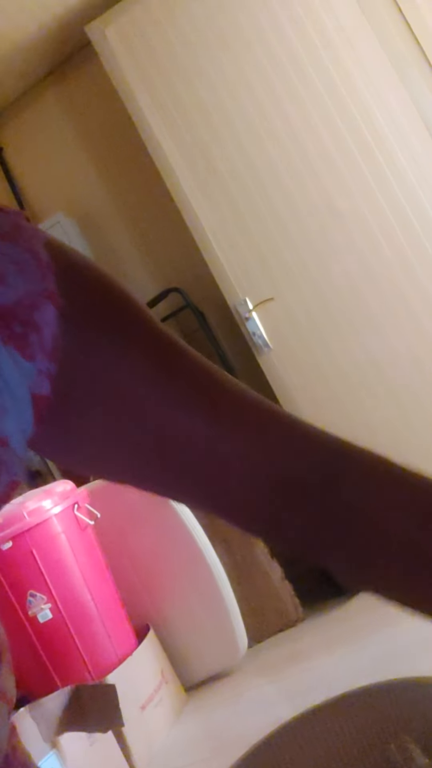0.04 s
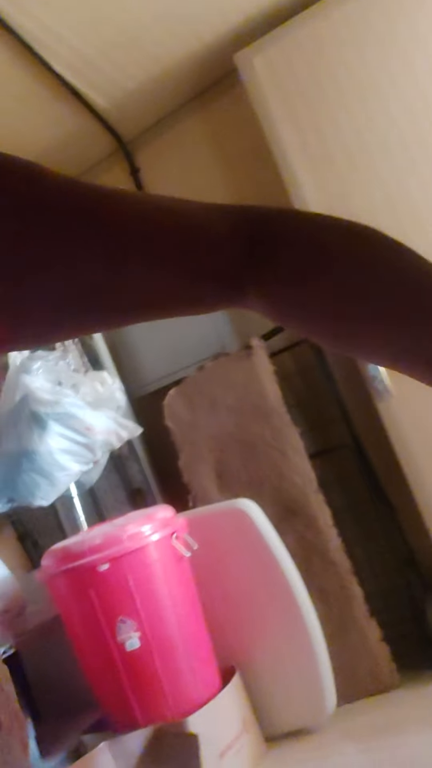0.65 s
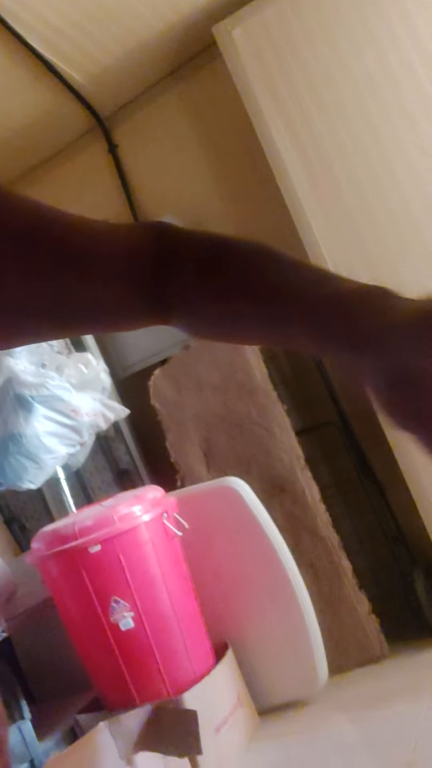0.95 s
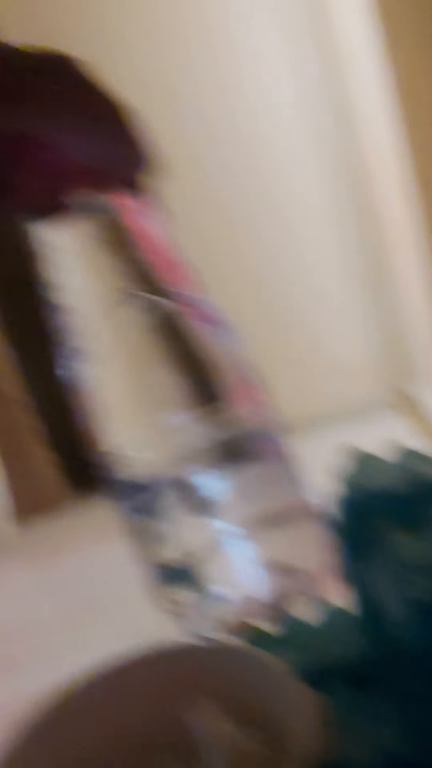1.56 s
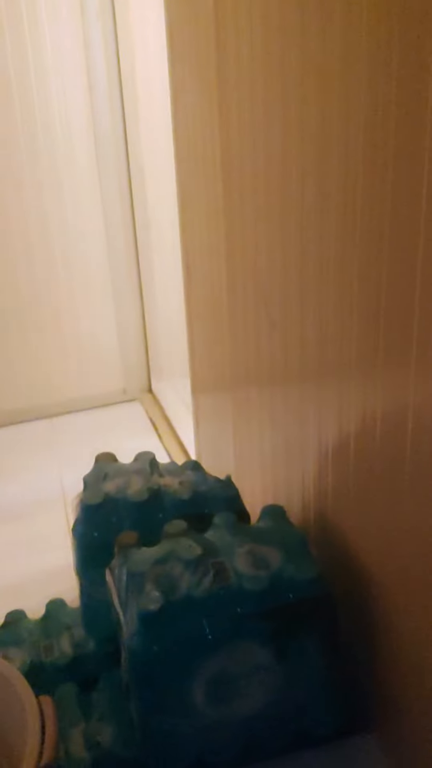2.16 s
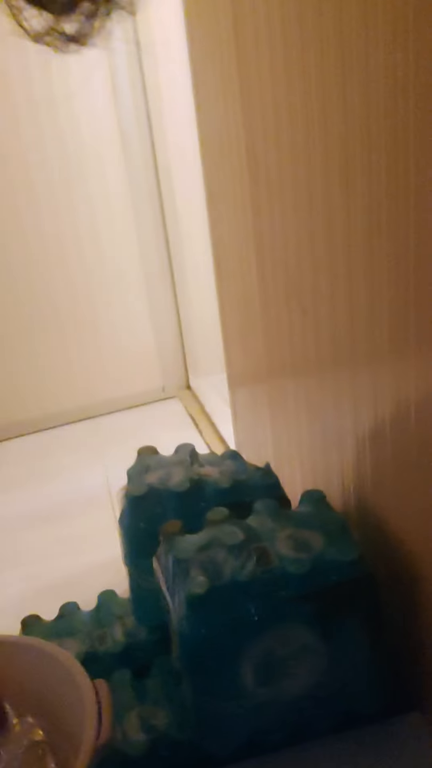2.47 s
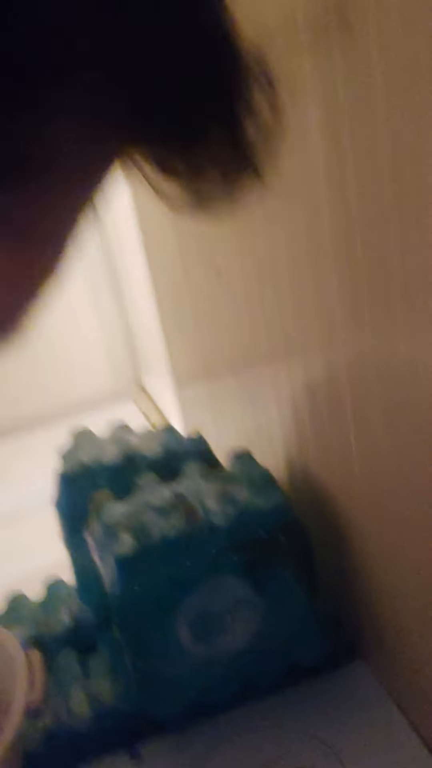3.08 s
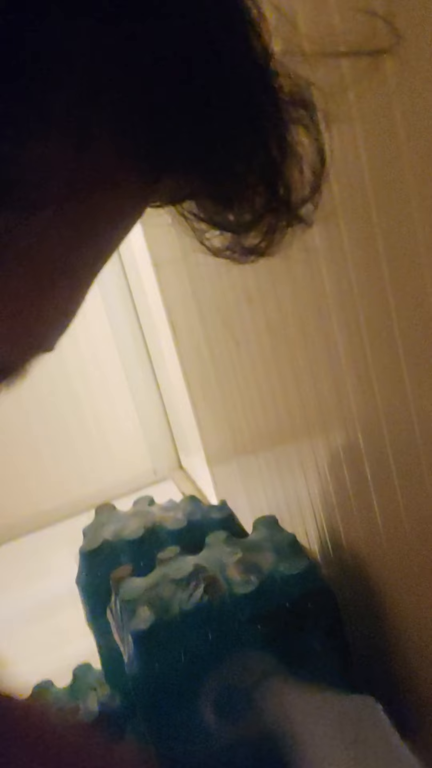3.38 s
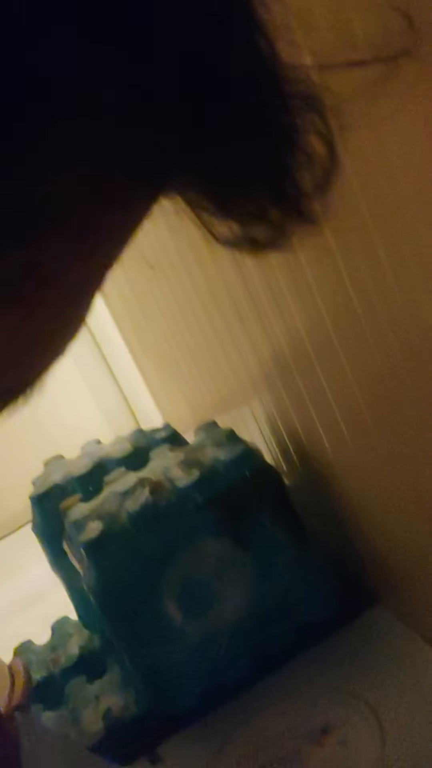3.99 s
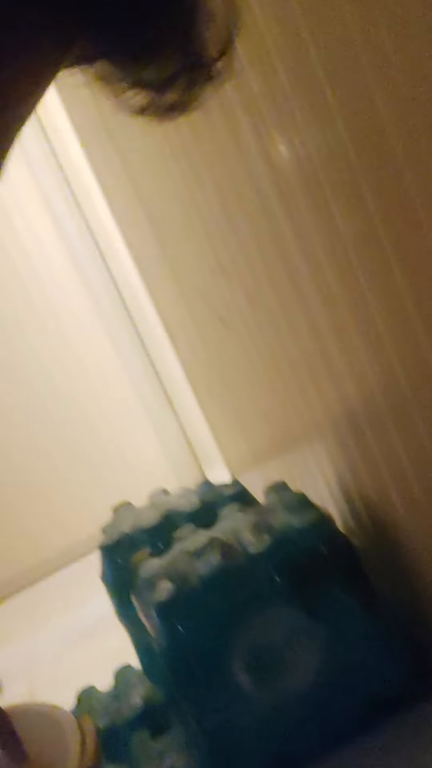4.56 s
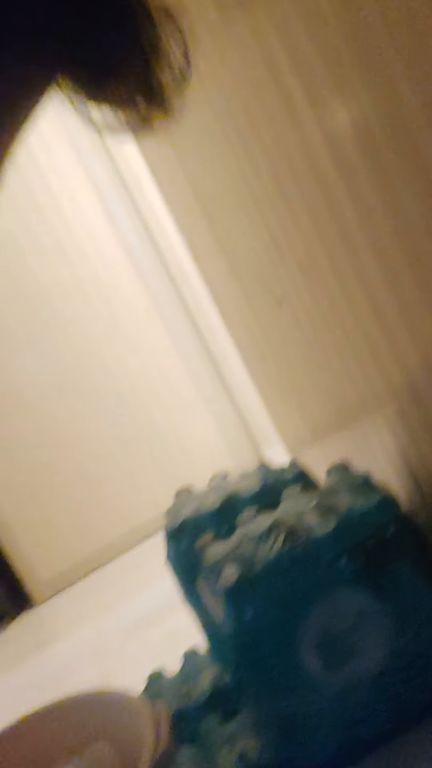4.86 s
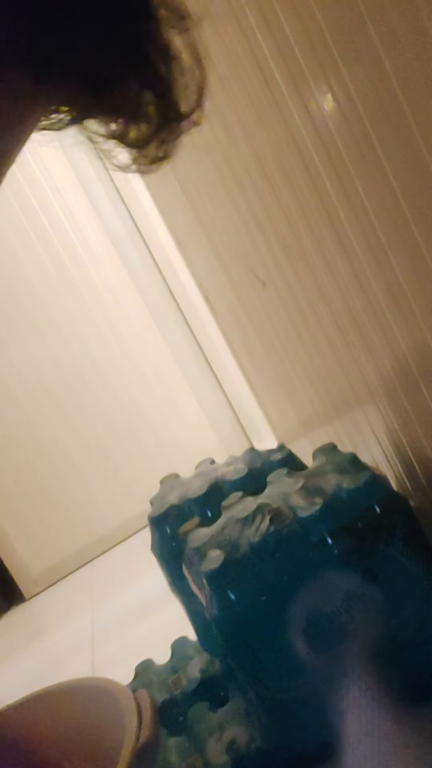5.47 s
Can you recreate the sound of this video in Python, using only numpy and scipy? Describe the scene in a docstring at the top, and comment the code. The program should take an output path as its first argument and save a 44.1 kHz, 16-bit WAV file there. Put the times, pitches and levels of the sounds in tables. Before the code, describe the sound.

Close rustles and bumps, with two bursts of plastic scraping, cracking and knocking against a hollow panel over a low hum.

```python
"""Soft rustling and bumps, then twice a scrape, a sharp snap and a hollow clunk: stiff plastic things
shifted by hand in the corner of a small, hard-walled room, close to the two microphones of a carried phone.
The plastic sticks and slips as it drags, cracks in tiny bursts and knocks against a hollow panel,
which rings on. A low hum and a few thin, distant chirps sit underneath."""
import sys
import numpy as np
from scipy import signal
from scipy.fft import rfft, irfft, next_fast_len
from scipy.io import wavfile

SR = 44100
rng = np.random.default_rng(int(sys.argv[2]) if len(sys.argv) > 2 else 0)


def wav_out(sig):
    """Save sig, one row per channel (or a flat mono array), as 16-bit PCM at SR to the path in sys.argv[1]."""
    wavfile.write(sys.argv[1], SR, np.round(np.clip(np.atleast_2d(sig).T, -1, 1) * 32767).astype(np.int16))


N = 252693

# room tone: (frequency [Hz], relative level [dB])
ROOM_TONE = [(15, -41.5), (25, -33), (38, -5), (92, -1), (120, -11.5), (145, -21), (200, -19.5), (285, -25),
             (489, -40.5), (887, -48.5), (1190, -48.5), (1480, -55), (3340, -50.5), (16000, -53)]
# lines of the low hum: (pitch [Hz], level before the swell [dB], part of the swell followed [share])
HUM_LINES = [(53, -58, .4), (84, -53.5, 1), (111.6, -62.5, .4)]
# the hum swells as the phone nears the corner: (time [s], gain [dB])
HUM_SWELL = [(0, -19.5), (1.6, -15), (2.3, 4.5), (3.3, -3.5), (4.6, 1.5), (5.1, -17.5), (5.73, -11)]
# far chirps: (time [s], length [s], first pitch [Hz], last pitch [Hz], level [dB], pitch waver [share])
CHIRPS = [(0.639, 0.062, 5140, 4830, -62.5, 0.04), (0.708, 0.14, 4760, 4060, -64.5, 0.13),
          (2.074, 0.097, 4900, 5067, -55.5, 0.05), (2.15, .12, 4324, 4190, -58, .028),
          (2.18, 0.066, 5050, 4880, -58.5, 0.0095), (3.365, 0.051, 5480, 5500, -58, 0.065),
          (4.185, 0.095, 5470, 5630, -56.5, 0.069), (5.423, 0.054, 5200, 5230, -66, 0.056)]
# decay of the room: (frequency [Hz], time to fall 60 dB [s])
ROOM_T60 = [(80, 0.33), (300, 0.36), (1000, 0.33), (4000, 0.34), (8000, 0.39), (15000, 0.31)]
# colour of the reverberation: (frequency [Hz], gain [dB])
ROOM_COLOUR = [(80, 1.5), (220, 1.5), (450, -5.5), (1000, -1), (4000, 0), (9000, -0.5), (15000, 1.5)]
# likeness of the reverberation at the two microphones: (frequency [Hz], correlation [-1 to 1])
ROOM_LIKENESS = [(70, 1), (140, 1), (280, 0.42), (550, 0.26), (1000, -0.69), (2000, 0.053), (8000, -0.46)]
# echoes off the floor and the nearest walls: (delay [s], gain [dB])
CORNER_ECHOES = [(.0062, -10.5), (0.011, -14.5), (.018, -15), (.031, -17)]
# a faint ring dying away at the start, then strokes of cloth and thin plastic: (peak time [s],
# fizz level [dB], 20 dB swell [s], 20 dB fade [s], body over fizz [dB], dull rub over fizz [dB])
TAIL_AND_STROKES = [(0, -72, .1, 0.19, 6, 7), (1.0, -67.5, 0.67, 0.36, -5, -2),
                    (1.10, -50, 0.062, 0.16, -12, -14), (1.175, -47, 0.071, 0.076, -2.5, -11.5),
                    (1.21, -46, 0.12, 0.045, 0.5, -10), (2.14, -67, 0.38, 0.46, -6, -1.5),
                    (3.18, -50.5, 0.21, .17, 0, 8), (3.455, -52, 0.16, 0.43, -1, -3),
                    (3.734, -38, 0.019, 0.04, -4, -9.5), (3.81, -51, 0.23, .2, -6.5, -2.5),
                    (4.075, -52, 0.11, 0.17, -4, -8), (4.31, -48, .3, 0.35, -8, -2.5),
                    (4.44, -41, 0.19, 0.1, -13.5, -12), (4.751, -57, 0.071, 0.13, -8, 2.5),
                    (5.31, -51, 0.038, .11, 0, -9), (5.497, -56, 0.027, 0.034, -11, -14),
                    (5.553, -50, 0.044, 0.066, -1.5, -4), (5.654, -52.5, 0.072, 0.12, -2, 0),
                    (5.715, -55.5, 0.036, 0.092, 0, -12)]
# colour of the rustle: (frequency [Hz], relative level [dB])
RUSTLE_COLOUR = [(120, 11.5), (250, 12), (500, 0.5), (800, -1.5), (1350, 7), (4000, 4), (6000, -3),
                 (8500, -10.5), (12500, -11.5), (16000, -14)]
# modes of the hollow panel: (pitch [Hz])
PANEL_HZ = [102, 215, 292, 328, 439, 483, 559, 605, 831, 883, 1052, 1260, 1653, 1775]
# ring of those modes: (relative level [dB], time to fall 60 dB [s])
PANEL_MODES = [(1, 0.45), (-6.5, 0.73), (0.5, 0.44), (-13, 0.6), (-1.5, 0.22), (-4, 0.39), (-9, 0.1),
               (-6, 0.17), (-9, 0.1), (-21, 0.42), (-16.5, 0.14), (-3, 0.12), (-7, 0.17), (-10, 0.28)]
# plastic dragged over the panel: (time [s], length [s], starting level [dB], tilt [dB per octave])
SCRAPES = [(2.545, .055, -36.5, 1), (2.583, .022, -30, -2), (2.691, .058, -24.5, 0),
           (3.882, 0.072, -49.5, -7), (4.015, .119, -52.5, -0.5), (4.293, 0.044, -36, -4.5),
           (4.369, 0.16, -47.5, -7.5), (4.781, 0.031, -36, 1.5), (4.817, .058, -21.5, 0.6),
           (4.959, .057, -37, 1), (5.001, 0.066, -32, -0.5), (5.294, .05, -50, -0.5),
           (5.634, 0.046, -53, -1)]
# colour of the drag: (frequency [Hz], relative level [dB])
SCRAPE_COLOUR = [(60, -4.5), (150, 7), (400, 4), (850, 0), (1300, -2.5), (2500, -10.5), (4500, -11.5),
                 (8000, -20), (13000, -18), (16000, -28.5)]
# a thing set against the panel, edge after edge: (time [s], level [dB], contact pitch [Hz],
# panel ring gain [dB], delay of second edge [s], second edge over first [dB])
KNOCKS = [(1.112, -45.5, 137, -5, 0.11, 3.5), (2.570, -27.5, 276, -4.5, .014, 0),
          (2.692, -24.5, 710, 1, 0.03, 2), (2.712, -21, 92, -13, .026, -5),
          (2.731, -21.5, 404, 0, 0.00709, 0), (2.750, -13.5, 265, -10, .026, -6),
          (3.141, -24, 278, -17, .032, -16), (3.358, -41.5, 250, 5, 0.024, -21),
          (3.446, -24.5, 300, -10, .016, -12.5), (3.900, -44, 225, 1.5, 0.03, 2.5),
          (4.007, -32, 112, -8.5, .014, -2.5), (4.300, -37.5, 283, -5, .010, 7.5),
          (4.342, -32, 177, 4, 0.022, -12.5), (4.497, -37, 170, -10, .02, -11.5),
          (4.79, -20, 135, -5, 0.0133, -5.5), (4.835, -18, 289, -37, .010, 0),
          (4.866, -25.5, 218, -12, .021, -5), (4.929, -26.5, 298, 4.5, .04, -13),
          (4.975, -34.5, 760, -3, .034, 4), (5.040, -24, 380, -8.5, 0.048, -9.5),
          (5.304, -33, 296, -10.5, 0.045, -7), (5.568, -49, 296, 7.5, .015, -11),
          (5.653, -40, 125, 1.5, 0.027, -7)]
# soft taps of fingers and small parts: (time [s], level [dB], band centre [Hz])
TAPS = [(.258, -54, 5700), (2.135, -51, 7060), (2.895, -39, 1130), (3.104, -48.5, 3140), (3.139, -44, 1220),
        (3.354, -41, 1010), (3.358, -43.5, 5500), (3.71, -40.5, 4700), (3.728, -36, 4600),
        (3.895, -50, 3700), (4.021, -47, 6500), (4.301, -33.5, 2304), (4.517, -44, 9800),
        (4.746, -48.5, 7440), (5.030, -30.5, 750), (5.343, -39.5, 4500)]
# hard plastic snapping close by: (time [s], level [dB], band centre [Hz], length [s])
SNAPS = [(2.5605, -34, 9450, 0.0033), (2.5825, -25.5, 4000, 0.0076), (2.5893, -21.5, 4900, 0.0025),
         (2.6143, -11.5, 7460, 0.0053), (2.6146, -20.5, 3150, 0.013), (2.6915, -21, 1463, .0046),
         (4.7885, -31.5, 2870, 0.0035), (4.8200, -29.5, 4700, .0026), (4.8793, -14.5, 7100, .0041),
         (4.8868, -12.5, 7900, 0.0024), (5.0060, -27.5, 4560, 0.0024), (5.0222, -17.5, 4630, 0.0031),
         (5.0225, -24, 10600, 0.0033)]


def gain_of(db):
    """Decibels to amplitude."""
    return 10 ** (np.asarray(db) / 20)


def unit_rms(x):
    """Scales to an rms of one."""
    return x / np.sqrt(np.mean(x ** 2) + 1e-20)


def unit_blow(x):
    """Scales a short sound to the energy of 2.5 ms at full level."""
    return x * np.sqrt(.0025 * SR / (np.sum(x ** 2) + 1e-20))


def curve_at(points, hz):
    """Reads a table on a log-frequency axis."""
    f, value = np.transpose(points)
    return np.interp(np.log(hz + 1), np.log(f), value)


def shaped(x, gain):
    """Filters by a gain that is a function of frequency."""
    size = next_fast_len(x.shape[-1] + 2048)
    return irfft(rfft(x, size) * gain(np.fft.rfftfreq(size, 1 / SR)), size)[..., :x.shape[-1]]


def butter(x, hz, kind, order=2):
    """Causal Butterworth filter."""
    return signal.sosfilt(signal.butter(order, np.clip(hz, 5, SR * .49), kind, fs=SR, output="sos"), x)


def add(mix, start_s, sound):
    """Mixes a sound in at a time."""
    part = mix[..., max(round(start_s * SR), 0):][..., :sound.shape[-1]]
    part += sound[..., :part.shape[-1]]


def wander(count, hz):
    """A random waver with an rms of one, mostly slower than hz."""
    return unit_rms(butter(rng.standard_normal(count), hz, "low"))


def grains(shape, per_s, spread_db):
    """Tiny slips at random moments, a few much larger than the rest."""
    size = gain_of(spread_db * np.minimum(rng.exponential(1, shape), 4))
    return unit_rms(rng.standard_normal(shape) * size * (rng.random(shape) < per_s / SR))


def room_tone(split_hz=500):
    """Low rumble, much alike at both microphones, under a faint, wide hiss."""
    noise = shaped(rng.standard_normal((2, N)), lambda f: gain_of(curve_at(ROOM_TONE, f)))
    noise = gain_of(-52) * unit_rms(noise)
    rumble = gain_of(-3) * shaped(noise + 0.62 * noise[::-1], lambda f: f < split_hz)
    hiss = shaped(noise, lambda f: f >= split_hz)
    return rumble + hiss


def hum(drift_hz=1.6):
    """A low, wavering hum that swells as the phone nears the corner."""
    out = np.zeros(N)
    swell_db = np.interp(np.arange(N) / SR, *np.transpose(HUM_SWELL))
    for hz, db, share in HUM_LINES:
        turns = np.cumsum(hz + drift_hz * wander(N, hz=5.2)) / SR
        out += gain_of(db + share * swell_db) * unit_rms(np.sin(2 * np.pi * turns))
    return out


def distant_chirps(waver_hz=350, tail_t60=0.63):
    """Thin gliding whistles with an unsteady pitch, smeared by distance."""
    out, t = np.zeros(N), np.arange(SR) / SR
    for start, length, first_hz, last_hz, db, waver in CHIRPS:
        count = int(length * SR)
        hz = np.linspace(first_hz, last_hz, count) * (1 + waver * wander(SR, waver_hz)[:count])
        whistle = np.sin(2 * np.pi * np.cumsum(hz) / SR) * signal.windows.tukey(count, .5)
        add(out, start, gain_of(db) * unit_rms(whistle))
    tail = rng.standard_normal((2, SR)) * gain_of(-60 * t / tail_t60)
    return signal.fftconvolve(out[None], tail / np.linalg.norm(tail[0]), axes=1)[:, :N]


def room_reverb(x, build_s):
    """Dense echoes off near, hard walls build up quickly; each band dies at its own speed."""
    hz, t, bands = signal.stft(rng.standard_normal((2, SR * 3 // 4)), SR, nperseg=256)
    likeness = np.clip(curve_at(ROOM_LIKENESS, hz), -1, 1)[:, None]
    bands[1] = likeness * bands[0] + np.sqrt(1 - likeness ** 2) * bands[1]
    t60 = curve_at(ROOM_T60, hz)[:, None]
    equal_energy = np.sqrt(np.log(1e6) / (t60 * SR))
    bands *= gain_of(curve_at(ROOM_COLOUR, hz)[:, None] - 60 * t / t60) * equal_energy
    tail = signal.istft(bands, SR, nperseg=256)[1]
    tail *= 1 - np.exp(-(np.arange(tail.shape[1]) / SR / build_s) ** 2)
    return signal.fftconvolve(np.atleast_2d(x), tail, axes=1)[:, :N]


def corner_echoes(x):
    """The first few separate echoes, off the floor and the nearest walls."""
    out = np.zeros(N)
    for delay, db in CORNER_ECHOES:
        add(out, delay, gain_of(db) * x)
    return out


def tail_and_rustle(crinkle_db=1.5, crinkle_hz=45):
    """A faint ring dies away at the start; then cloth and film slide in fine grains over a dull rub."""
    t = np.arange(N) / SR
    slips = grains((2, N), per_s=6000, spread_db=1.5)
    slips = shaped(slips, lambda f: gain_of(curve_at(RUSTLE_COLOUR, f)))
    fizz = gain_of(-1) * unit_rms(butter(slips, 7900, "high", order=3))
    body = gain_of(-2) * unit_rms(butter(slips, [900, 5000], "band"))
    rub = gain_of(-1) * unit_rms(butter(slips + .5 * slips[::-1], [150, 600], "band"))
    fizz_power, body_power, rub_power = np.zeros((3, N))
    for peak, db, swell, fade, body_db, rub_db in TAIL_AND_STROKES:
        level = db - 20 * np.minimum(np.maximum((peak - t) / swell, (t - peak) / fade), 10)
        fizz_power += gain_of(level) ** 2
        body_power += gain_of(level + body_db) ** 2
        rub_power += gain_of(level + rub_db) ** 2
    crinkle = gain_of(crinkle_db * wander(N, crinkle_hz))
    return crinkle * (fizz * np.sqrt(fizz_power) + body * np.sqrt(body_power) + rub * np.sqrt(rub_power))


def panel_response(spread_rad=0.87):
    """The dying modes of the hollow panel, each reaching the two microphones a little out of step."""
    t, ring = np.arange(SR // 2) / SR, 0
    for hz, (db, t60) in zip(PANEL_HZ, PANEL_MODES):
        phase = spread_rad * rng.uniform(-1, 1, (2, 1))
        ring += gain_of(db - 60 * t / t60) * np.sin(2 * np.pi * hz * t + phase)
    return ring / np.linalg.norm(ring[0])


def panel_ring(x, db):
    """The ringing that a sound starts in the panel, at a level relative to that sound."""
    ring = signal.fftconvolve(np.atleast_2d(x), panel_response(), axes=1)[:, :N]
    return gain_of(db) * x.std() * unit_rms(ring)


def scrapes(fade_db=-5, taper=0.21):
    """Plastic sticks and slips over the panel in a stream of clicks, fading as each drag slows."""
    out = np.zeros(N)
    for start, length, db, tilt_db in SCRAPES:
        slips = grains((SR // 4,), per_s=3800, spread_db=3)
        rub = shaped(slips, lambda f: gain_of(curve_at(SCRAPE_COLOUR, f) + tilt_db * np.log2(f / 1000 + .1)))
        count = int(length * SR)
        envelope = gain_of(db + np.linspace(0, fade_db, count)) * signal.windows.tukey(count, taper)
        add(out, start, unit_rms(rub[:count]) * envelope)
    return out


def knocks(damping=0.23, cutoff_ratio=5.36, graze_s=.012, graze_db=-21):
    """A graze, then two edges land, each a heavily damped swing; returns contacts and panel ring."""
    contacts, rings = np.zeros(N), np.zeros((2, N))
    t, response = np.arange(SR // 8) / SR, panel_response()
    for start, db, hz, ring_db, gap, second_db in KNOCKS:
        phase = 2 * np.pi * hz * t
        swing = np.exp(-damping * phase) * np.sin(phase) * (1 - np.exp(-phase))
        push = unit_blow(butter(np.gradient(swing), hz * cutoff_ratio, "low", order=4))
        ring = gain_of(ring_db) * 2 * unit_blow(signal.fftconvolve(push[None], response, axes=1))
        for at, level in ((start - graze_s, db + graze_db), (start, db), (start + gap, db + second_db)):
            add(contacts, at, gain_of(level) * push)
            add(rings, at, gain_of(level) * ring)
    return contacts, rings


def slip_bursts(rows, octaves, body_db, right_db, attack):
    """Clusters of tiny slips a few milliseconds long: a band of noise over a weaker woody middle."""
    out, t = np.zeros((2, N)), np.arange(2048) / SR
    pan_db = np.array([[-right_db], [right_db]]) / 2
    for start, db, hz, length in rows:
        age = t / length
        burst = rng.standard_normal((2, len(t))) * (1 - np.exp(-age / attack)) * np.exp(-age ** 2)
        crack = butter(burst, hz * 2 ** (octaves * np.array([-.5, .5])), "band")
        crack += gain_of(body_db) * butter(burst, [350, 1500], "band", order=1)
        add(out, start, gain_of(db + pan_db) * np.array([unit_blow(side) for side in crack]))
    return out


def finger_taps(length_s=0.0045):
    """Fingers and small parts touch right of centre, swelling rather than cracking."""
    rows = [(*row, length_s) for row in TAPS]
    return slip_bursts(rows, octaves=2.2, body_db=-35, right_db=3.5, attack=0.93)


def plastic_snaps():
    """Hard plastic snaps close to the microphones: bright cracks with a sudden onset."""
    return slip_bursts(SNAPS, octaves=1.61, body_db=-15, right_db=1, attack=0.049)


def phone_jolt(start_s=4.8868, db=-3.5, swing_s=0.0022, left_db=-12):
    """The hardest snap shakes the phone itself: one low push, mostly at the right microphone."""
    out, age = np.zeros((2, N)), np.arange(SR // 10) / SR / swing_s
    push = butter(-(1 - age) * np.exp(-age), 3000, "low")
    shake = 0.44 * np.sin(age * 0.83) * np.exp(-age / 7)
    add(out, start_s, gain_of(db + np.array([[left_db], [0]])) * (push + shake))
    return out


def scene(left_lag_samples=9):
    """Close handling in the corner, with the ringing panel, the room and the background behind it."""
    blows, blow_ring = knocks()
    rubs = scrapes()
    rub_ring = panel_ring(rubs, db=-4)
    snaps, taps, soft_noise = plastic_snaps(), finger_taps(), tail_and_rustle()
    clicks, contacts = snaps + taps, blows + rubs
    # the panel is to the right, so its sound reaches the left microphone later
    panel = np.array([np.roll(contacts, left_lag_samples), contacts])
    # it stands against the wall, so its echoes crowd in sooner than those of the clicks
    echoes = corner_echoes(blows) + room_reverb(gain_of(1) * panel, build_s=0.0025)
    echoes += room_reverb(clicks + gain_of(-10.5) * soft_noise, build_s=0.0037)
    ringing = blow_ring + rub_ring + panel_ring(taps, db=-4.5)
    background = distant_chirps() + room_tone() + hum()
    return background + echoes + soft_noise + ringing + panel + clicks + phone_jolt()


def record(dry, left_db=-1, left_bass_hz=75, right_bass_hz=30, ceiling=.9, top_hz=16100):
    """The phone: left microphone weaker and thinner in the bass, peaks rounded, top treble cut."""
    left = gain_of(left_db) * shaped(dry[0], lambda f: f ** 2 / (f ** 2 + left_bass_hz ** 2))
    right = shaped(dry[1], lambda f: f ** 2 / (f ** 2 + right_bass_hz ** 2))
    both = np.array([left, right])
    rounded = both / (1 + (both / ceiling) ** 6) ** (1 / 6)
    lowpass = signal.firwin(301, top_hz, window=("kaiser", 9), fs=SR)
    return signal.oaconvolve(rounded, lowpass[None], "same")


dry = scene()
out = record(dry)
wav_out(out)
```